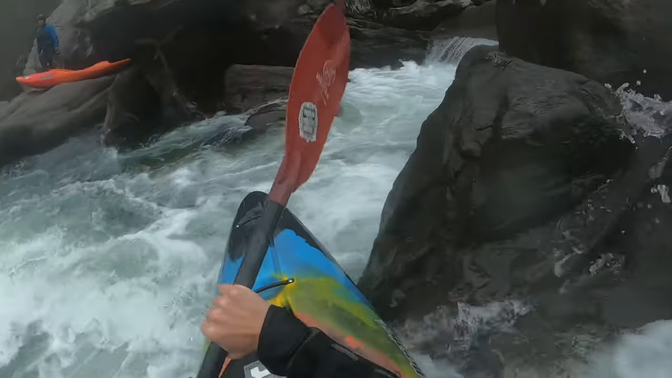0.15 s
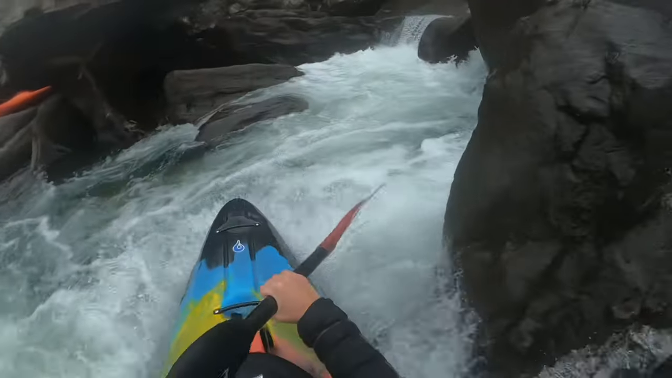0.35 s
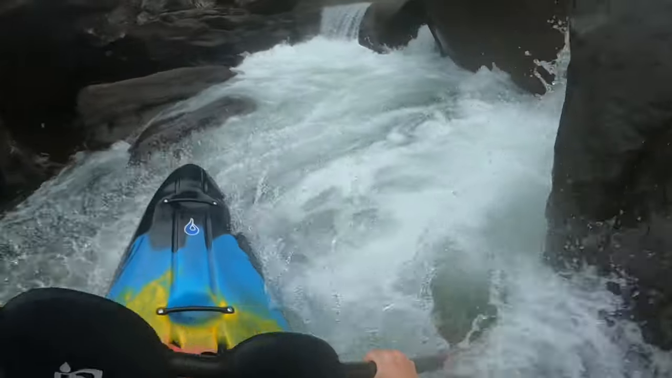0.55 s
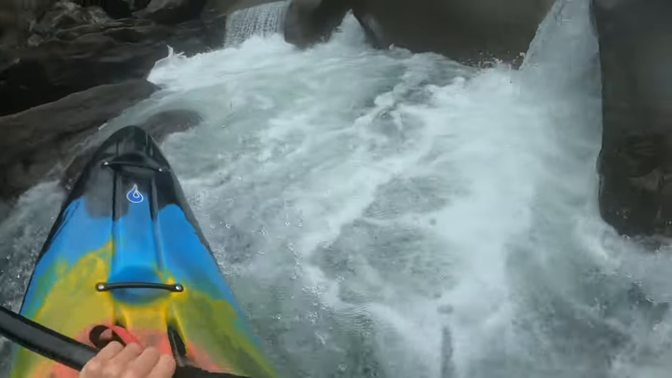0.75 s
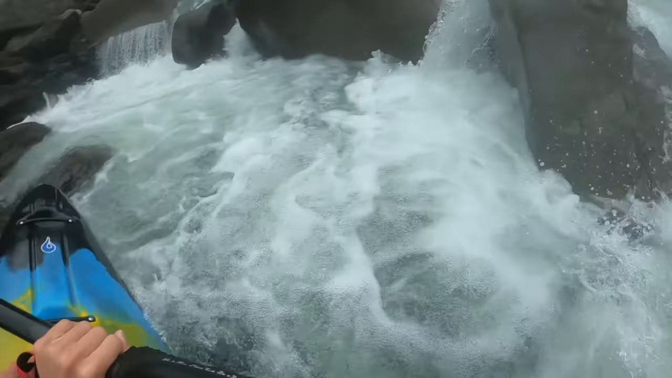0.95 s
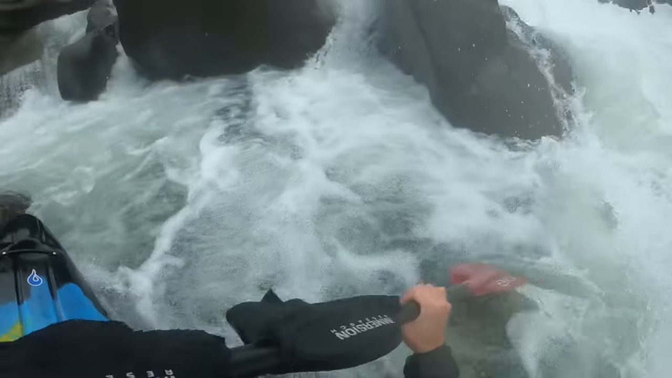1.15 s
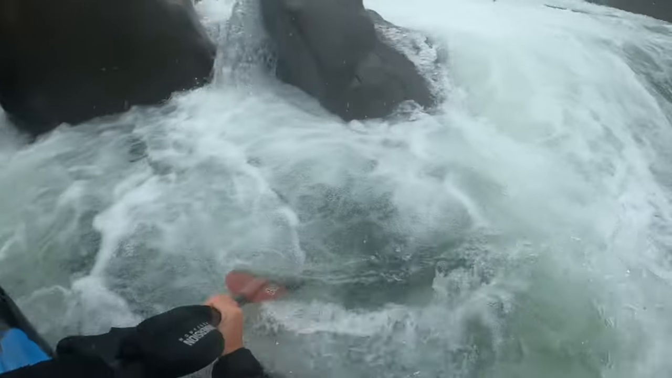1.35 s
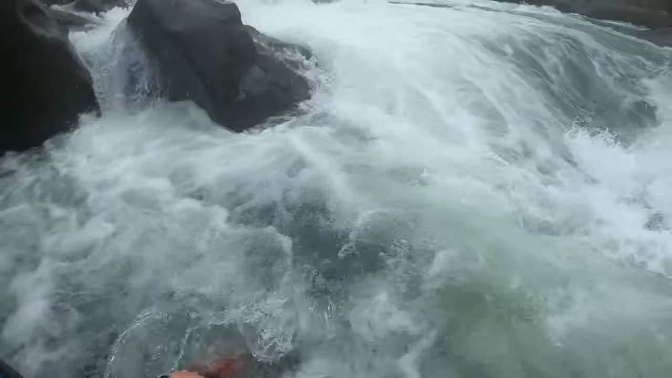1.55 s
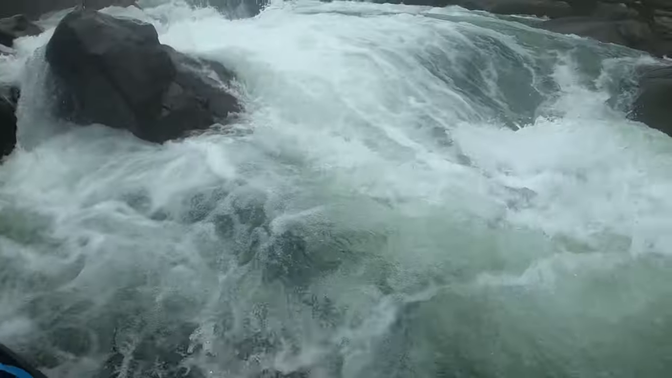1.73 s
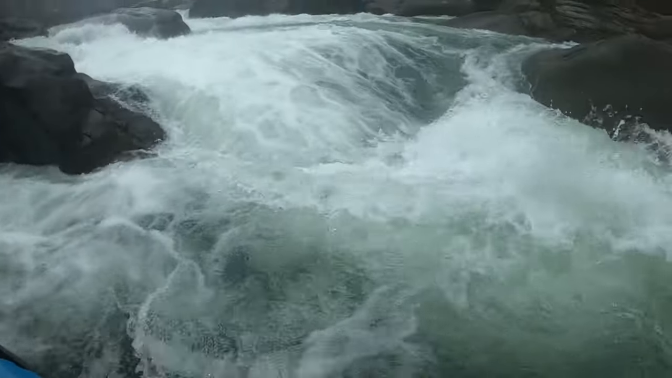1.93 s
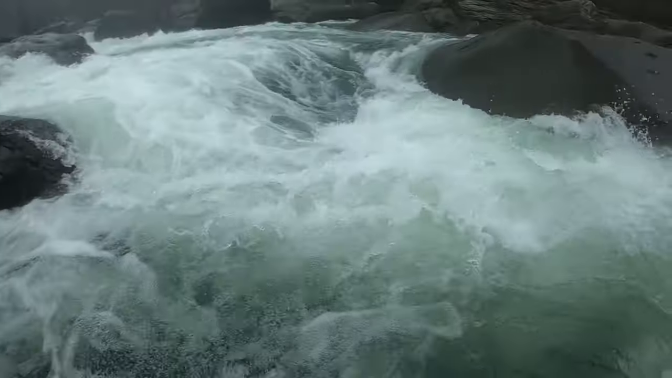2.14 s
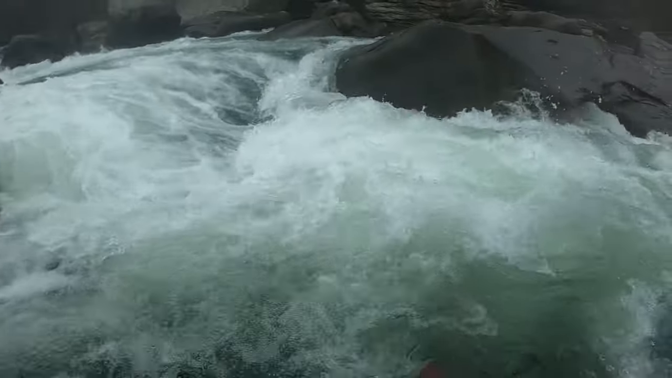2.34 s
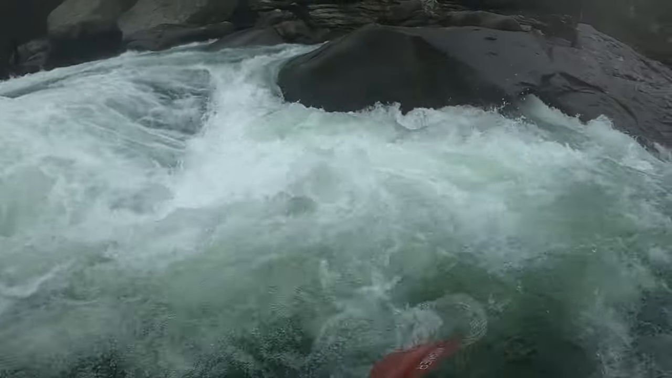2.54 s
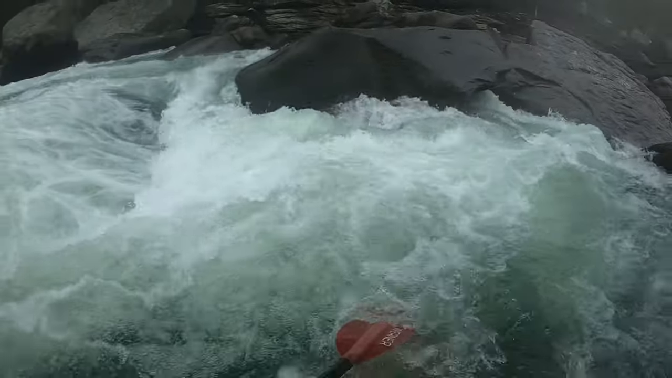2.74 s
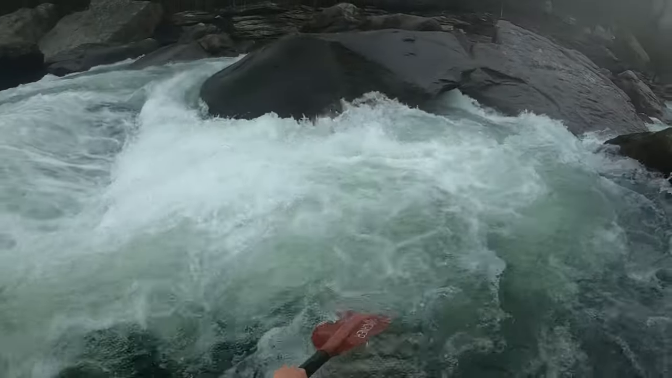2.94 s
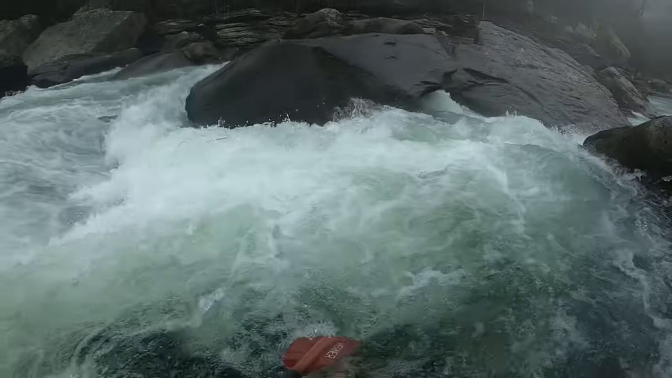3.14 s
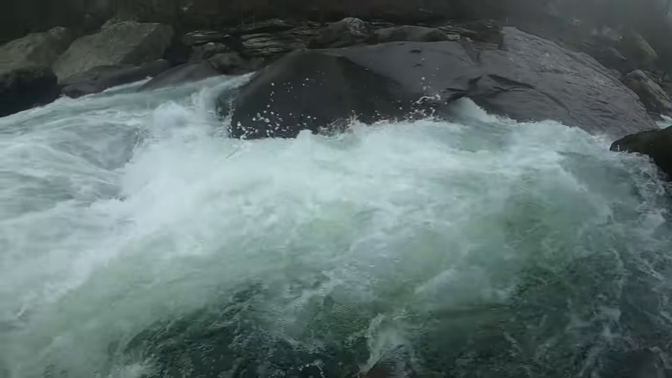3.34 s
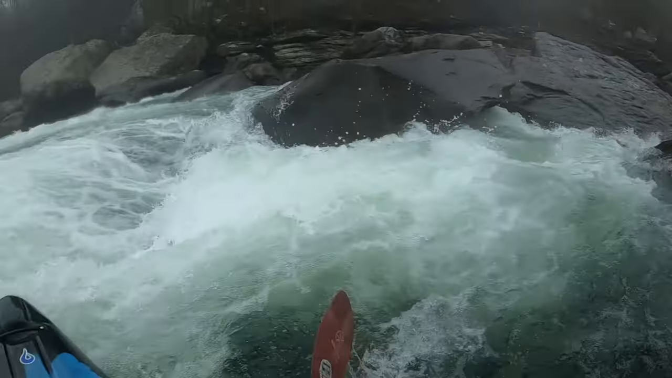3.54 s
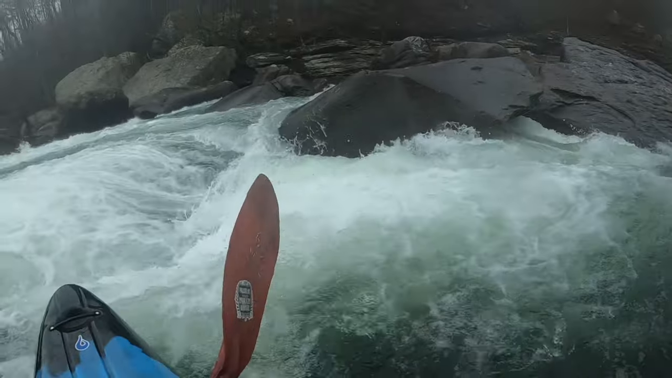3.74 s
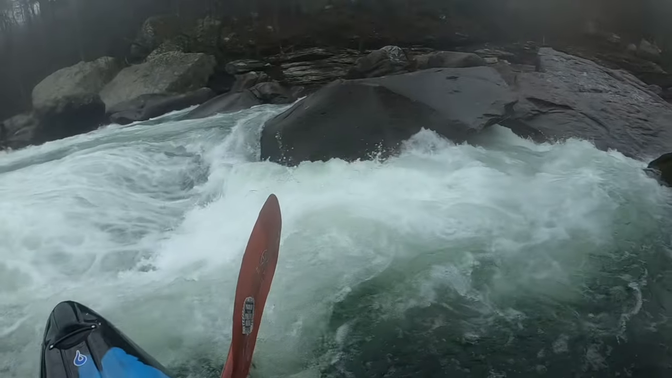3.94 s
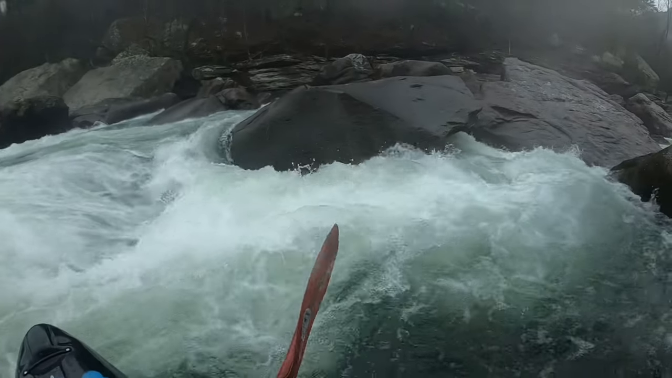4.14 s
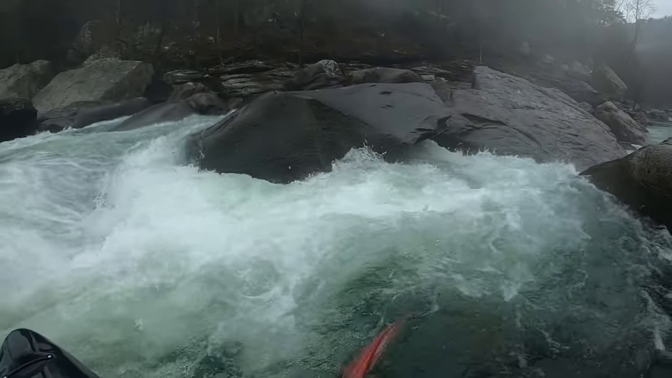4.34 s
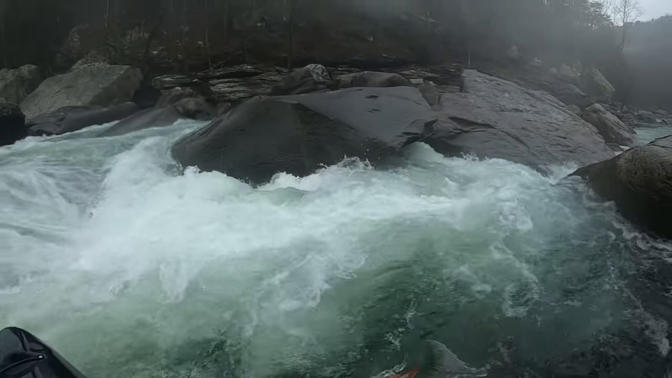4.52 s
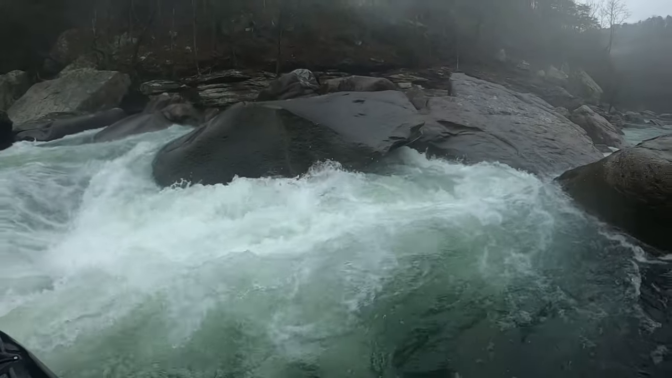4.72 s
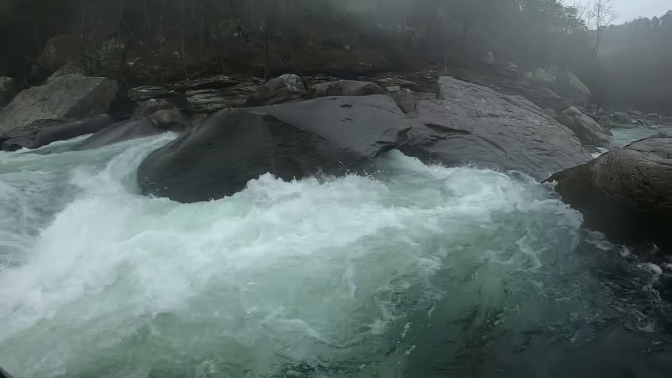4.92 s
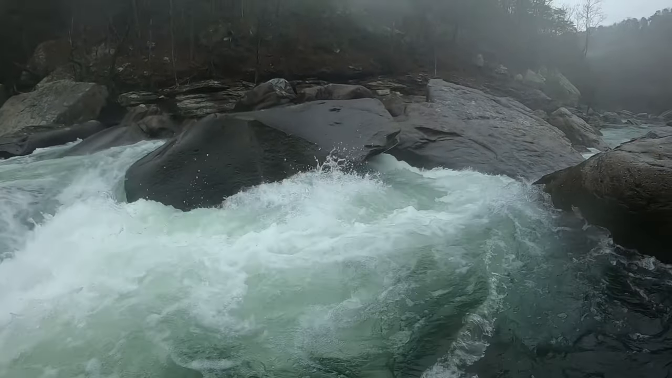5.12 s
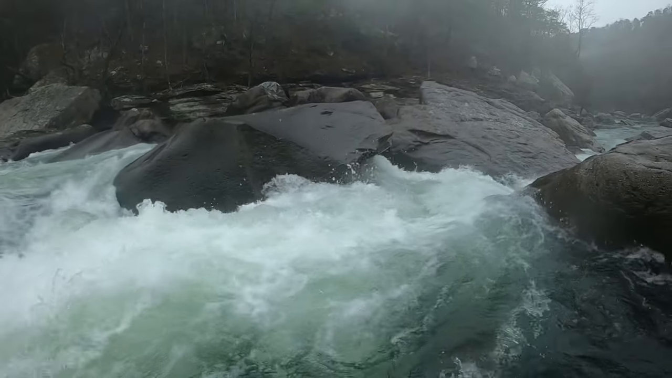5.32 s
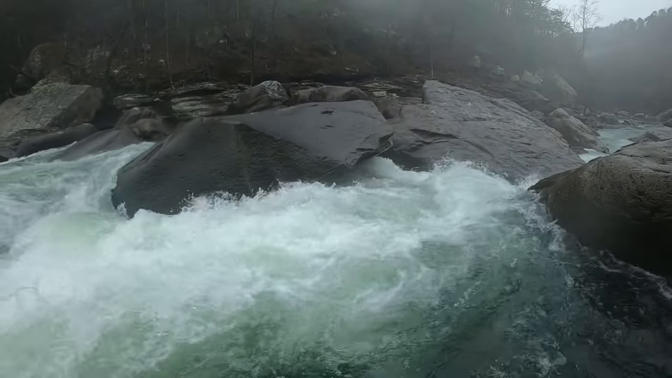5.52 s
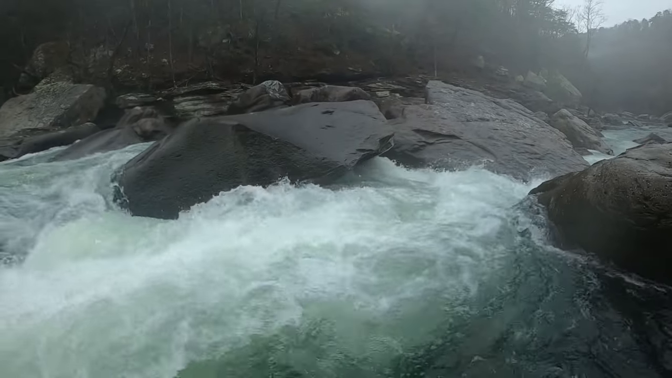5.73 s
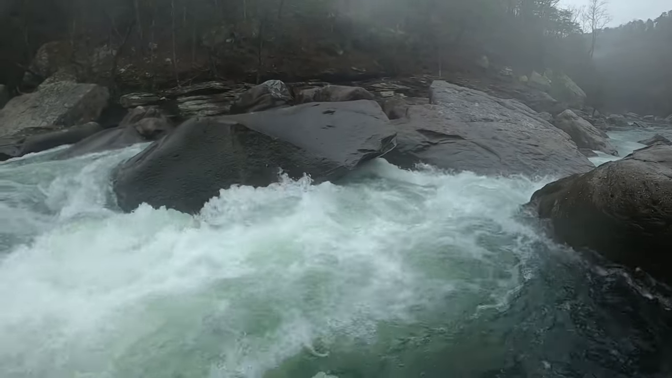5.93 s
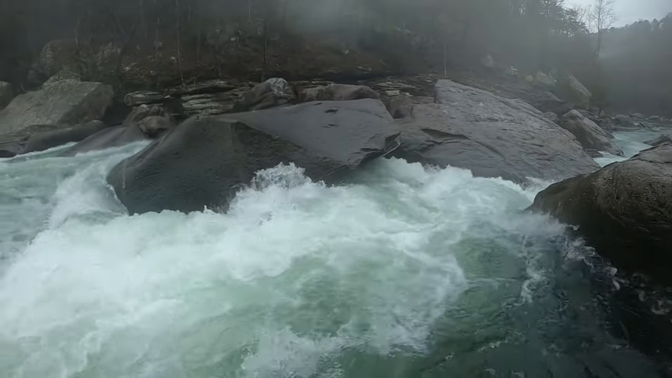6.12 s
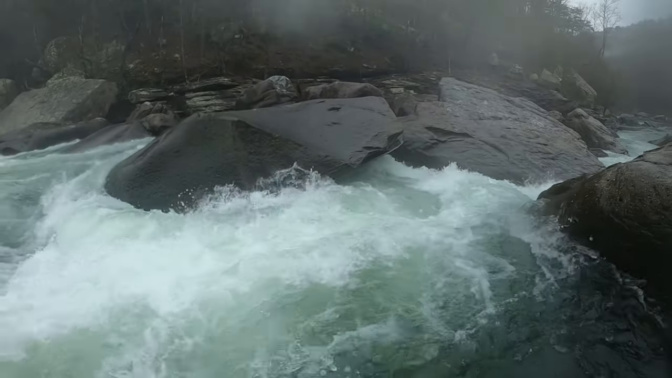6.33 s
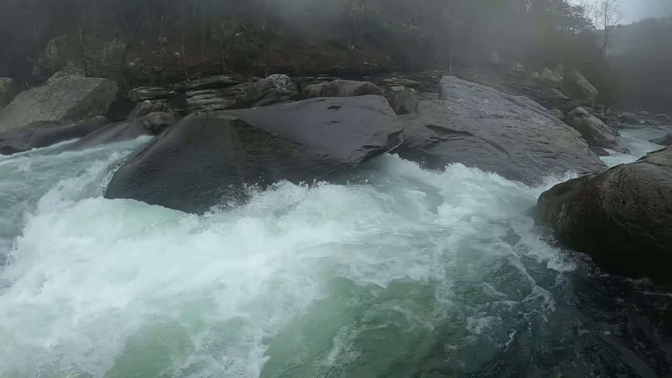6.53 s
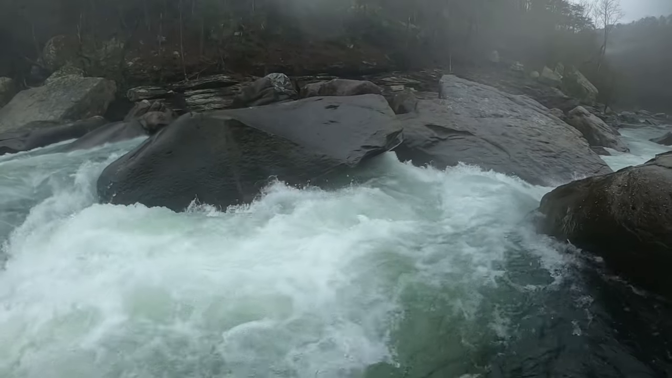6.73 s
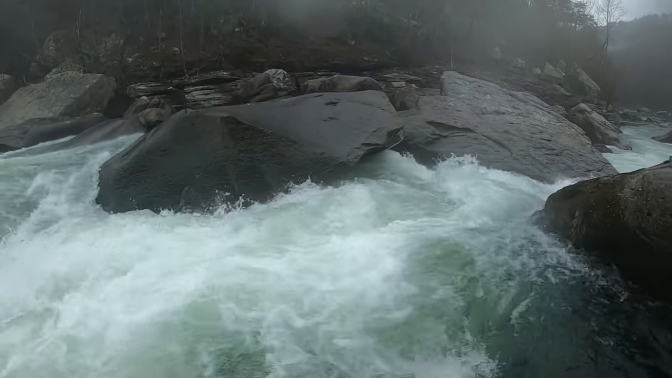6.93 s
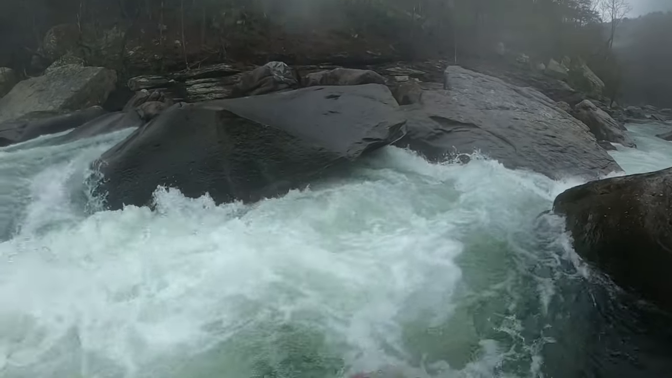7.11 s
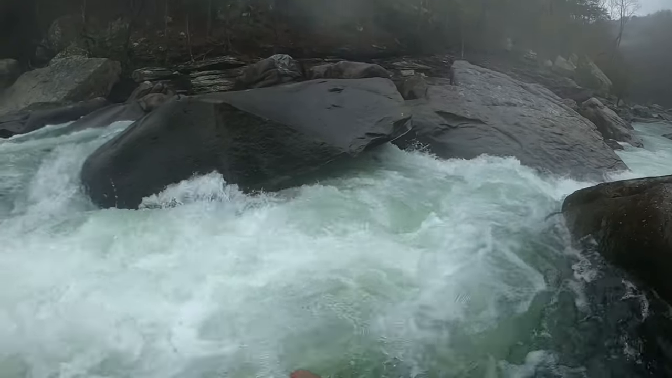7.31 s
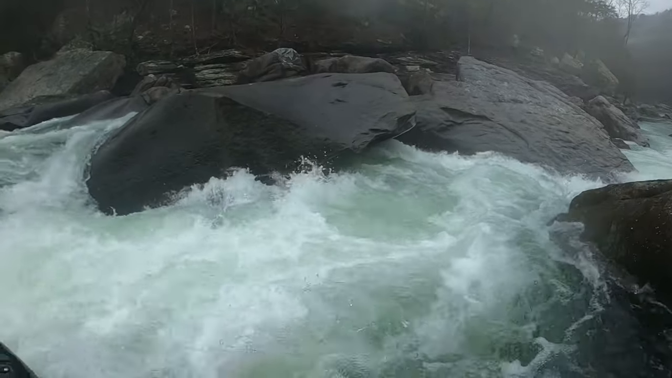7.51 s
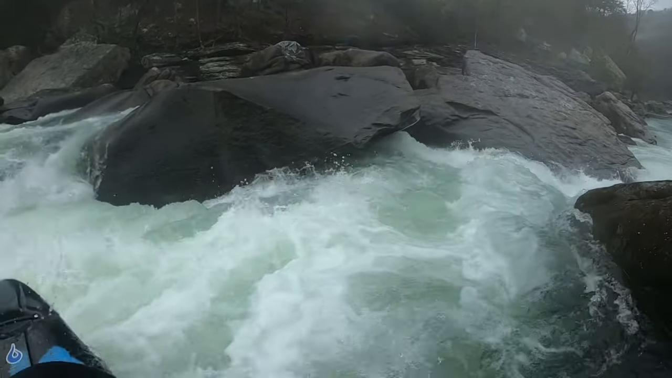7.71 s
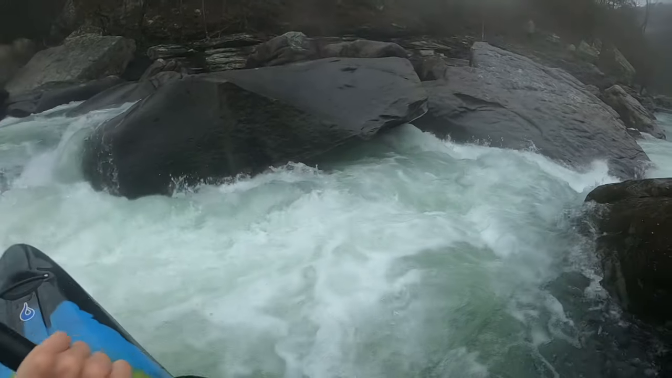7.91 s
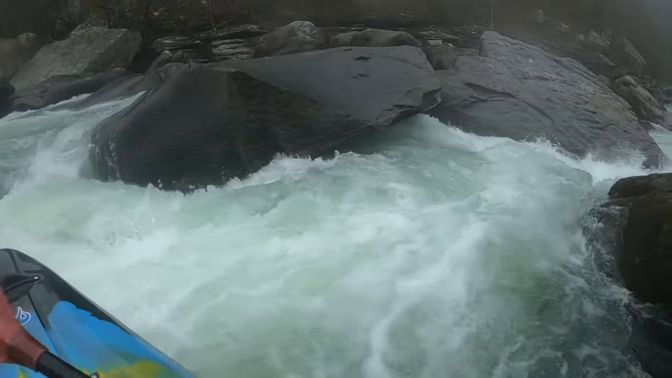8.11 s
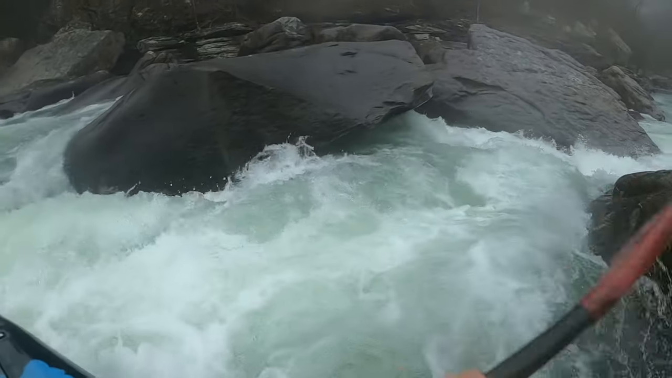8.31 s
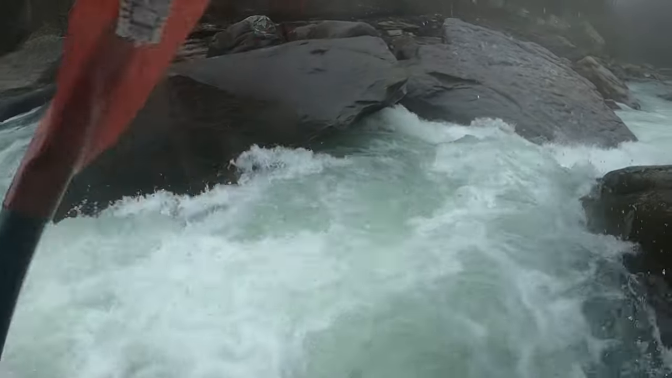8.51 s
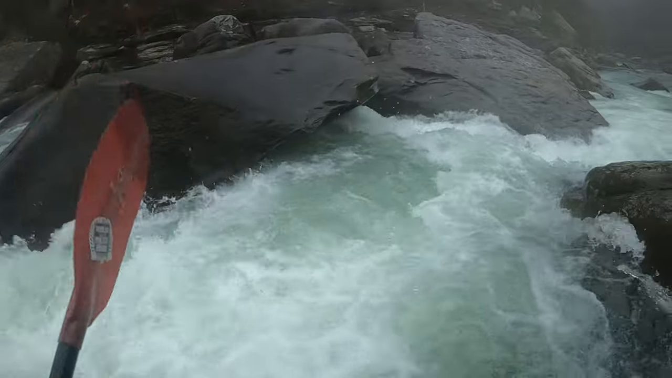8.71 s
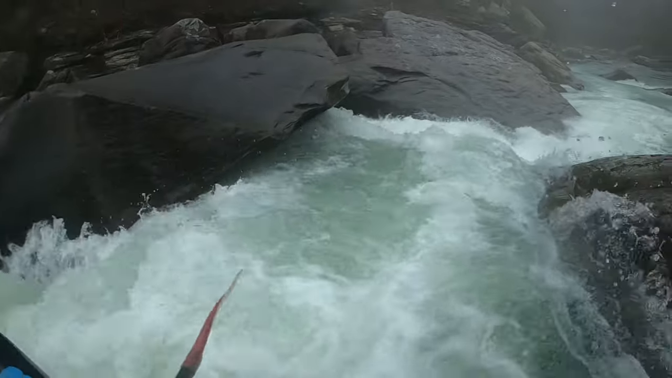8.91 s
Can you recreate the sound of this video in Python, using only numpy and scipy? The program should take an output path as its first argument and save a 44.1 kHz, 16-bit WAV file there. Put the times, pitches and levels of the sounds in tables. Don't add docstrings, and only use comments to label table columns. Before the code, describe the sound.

A continuous, close whitewater roar surrounds a kayak, hollow and hissy in wide stereo through a small waterproof camera's ports, with heavy low churning and wind rumble on the housing. From 0 to 1.3 s drops strike hard: ticks, bassy thumps, short crackling spatters and clipped knocks, densest around 0.5-1.2 s, each making the roar duck; a bubble bloops at 0.4 s. Softer low bumps follow near 1.6 s. From 2 s the subdued rush slowly climbs, becoming full and steady by about 4 s as the gusts ease. Small rounded bubbles pop near 2.1, 3.2, 3.5, 4.0, 4.5, 6.0 and 7.2 s, several leaning left. Light spatter and dull bumps come around 6.4 s, with more spatter at 7.6 and 8.3 s as wind rumble returns. At 8.7 s a violent smack overloads the microphone, and the roar drops sharply until the end at about 9 s.

```python
import sys
import numpy as np
from scipy import signal
from scipy.fft import rfft, irfft
from scipy.io import wavfile
from scipy.ndimage import uniform_filter1d

SR = 44100
rng = np.random.default_rng(int(sys.argv[2]) if len(sys.argv) > 2 else 0)


def gain_from_db(level_db):
    decades = np.asarray(level_db, float) / 20
    return 10 ** decades


def store_pcm(level_fs):
    pcm = np.round(np.clip(level_fs, -1, 1) * 32767).astype(np.int16)
    wavfile.write(sys.argv[1], SR, np.atleast_2d(pcm).T)


N = 395136
TIME = np.arange(N) / SR
OPPOSITE = np.array([[1], [-1]])


def in_time(rows):
    s, *columns = np.transpose(rows)
    return [np.interp(TIME, s, c) for c in columns]


def at_hz(points, hz):
    p = np.array(points, float)
    return np.interp(np.log(hz + 1), np.log(p[:, 0] + 1), p[:, 1])


def drift(rate_hz):
    r = np.exp(-80 * np.pi * rate_hz / SR)
    noise = rng.standard_normal(N // 40 + 2002)
    slow = signal.lfilter([1], [1, -2 * r, r * r], noise)[2000:]
    smooth = np.interp(np.arange(N) / 40, np.arange(len(slow)), slow / slow.std())
    return uniform_filter1d(smooth, size=40)


def add(out, sound, start_s):
    i = max(int(start_s * SR), 0)
    out[..., i:i + sound.shape[-1]] += sound[..., :N - i]


# freq_hz, correlation
LIKENESS = [(30, .986), (250, .995), (450, .83), (690, .52), (950, .84), (1170, .78), (1350, .28),
            (1700, .77), (1930, .62), (2250, .8), (2600, .2), (3500, .58), (4900, .25), (7500, .08)]
# freq_hz, lead_rad
LEAD = [(60, .05), (260, .15), (520, .75), (750, .3), (1000, .4), (1250, 1.9), (1400, -.5), (1750, -.2),
        (2200, -1.1), (2700, .1), (3400, -1.1), (3900, -.6), (4700, -2.8), (6000, -3.4)]


def port_noise(left_db, right_db, hz, patchy_db, rate_hz, count, tilt_db=0):
    draw = rfft(rng.standard_normal((2, N)))
    alike = np.clip(at_hz(LIKENESS, hz), -.99, .995)
    shared = np.sqrt(1 + alike) * draw[0]
    opposed = np.sqrt(1 - alike) * draw[1] * OPPOSITE
    pair = (shared + opposed) * np.exp(.5j * at_hz(LEAD, hz) * OPPOSITE)
    pair = pair * gain_from_db(np.array([left_db, right_db]))
    loud_hz = hz[left_db > left_db.max() - 30]
    place = np.interp(np.log(hz + 1), np.log(loud_hz[[0, -1]] + 1), [0, count - 1])
    out, together = 0, drift(rate_hz)
    for k in range(count):
        band = irfft(pair * np.maximum(1 - abs(place - k), 0), N)
        flicker_db = patchy_db * (0.62 * together + drift(rate_hz))
        out = out + band * gain_from_db(flicker_db + tilt_db * (k / (count - 1) - .5))
    return out / out.mean(axis=0).std()


# time_s, level_db
PASSAGE = [(0, -22.5), (.12, -22.5), (.3, -28.5), (.55, -27.5), (1.0, -28.5), (1.15, -33.5), (2.0, -29),
           (2.9, -23), (3.6, -19.5), (4.2, -18.5), (5.8, -19), (6.8, -21), (8.4, -22), (8.67, -23.5),
           (8.71, -33), (8.96, -32.5)]


def passage_db():
    return in_time(PASSAGE)[0]


# freq_hz, density_db_per_hz
CHURN = [(40, -62), (75, -12), (105, 1), (140, 1), (200, 3.5), (260, -3), (330, -5.5), (430, -26),
         (900, -130)]
CHURN_UNDER_DB = -20
CHURN_FOLLOWS = 1.06


def churn(hz):
    level_db = CHURN_UNDER_DB + CHURN_FOLLOWS * (passage_db() + 20.5)
    shape_db = at_hz(CHURN, hz)
    return gain_from_db(level_db) * port_noise(shape_db, shape_db, hz, patchy_db=1.0, rate_hz=6.0, count=2)


# centre_s, half_length_s, above_lull_db
GUSTS = [(0, .06, 13.5), (.3, 0.076, 16.5), (0.545, 0.14, 22.5), (0.846, .09, 17.5), (1.11, 0.12, 25),
         (1.293, .06, 13.5), (1.65, 0.19, 14), (2.12, 0.26, 14.5), (3.197, 0.21, 7), (4.4, 0.19, 1),
         (5.45, 0.33, 3), (6.054, 0.13, 10.5), (6.42, 0.18, 10.5), (7.205, 0.42, 12), (7.645, 0.21, 11),
         (8.05, 0.24, 14.5), (8.437, 0.14, 17), (8.632, 0.066, 18.5), (8.925, .06, 17)]


def gusting_db():
    power = 1
    for centre_s, half_s, level_db in GUSTS:
        power = power + gain_from_db(2 * level_db) * np.exp(-2 * ((TIME - centre_s) / half_s) ** 2)
    return 10 * np.log10(power)


# freq_hz, density_db_per_hz
WIND = [(8, -12), (20, 19.5), (35, 5.5), (55, 6.5), (75, 1.5), (110, -13.5), (180, -32.5), (600, -130)]
LULL_DB = -2


def wind(hz):
    level_db = passage_db() + LULL_DB + gusting_db()
    shape_db = at_hz(WIND, hz)
    return gain_from_db(level_db) * port_noise(shape_db, shape_db, hz, patchy_db=2.5, rate_hz=6.5, count=2)


# freq_hz, level_db
SPRAY = [(7150, 1.5), (7650, -7.5), (8050, -29), (8250, -20.5), (8700, -13), (10800, -19), (12200, -17.5),
         (13500, -28), (15000, -33), (16500, -57)]
# freq_hz, density_db_per_hz
PORT_L = [(380, -6.5), (520, -5.5), (700, -10), (860, -11.5), (1150, -6.5), (1430, -4), (2000, -19),
          (2300, -14.5), (2850, -11.5), (3400, -11.5), (3800, -17.5), (5300, -21.5), (5850, -38),
          (7100, -34)]
# freq_hz, density_db_per_hz
PORT_R = [(380, -7.5), (520, -9), (700, -14), (860, -15.5), (1200, -9.5), (1700, -11.5), (2100, -16.5),
          (2600, -17), (3100, -12.5), (3450, -17.5), (3800, -17), (4600, -17), (5850, -28), (7100, -34.5)]
# left_hz, right_hz, width_hz, peak_db
CAVITY = [(975, 1068, 126, 11), (3003, 2350, 175, 4), (1274, 4100, 170, -0.5)]


def port_db(shape, side, hz):
    below = np.minimum(40 * np.log10((hz + 1) / 380), 0)
    peaks = 0
    for *centre_hz, width_hz, peak_db in CAVITY:
        peaks = peaks + peak_db / (1 + (2 * (hz - centre_hz[side]) / width_hz) ** 2)
    return at_hz(shape, hz) + peaks + below + at_hz(SPRAY, hz)


# time_s, treble_tilt_db
BRIGHTNESS = [(0, 4.5), (1.2, 2.5), (2.4, 1.5), (4, -0.9), (6, 0), (7.5, 2.5), (8.96, 1)]


def roar(hz):
    left_db = port_db(PORT_L, side=0, hz=hz)
    right_db = port_db(PORT_R, side=1, hz=hz)
    tilt_db = in_time(BRIGHTNESS)[0]
    noise = port_noise(left_db, right_db, hz, patchy_db=0.67, rate_hz=22, count=8, tilt_db=tilt_db)
    return gain_from_db(passage_db()) * noise


def river():
    hz = np.arange(N // 2 + 1) * SR / N
    return churn(hz) + wind(hz) + roar(hz)


# start_s, peak_db, pitch_hz, left_over_right_db
BUBBLES = [
    (0.433, 3.5, 1460, 6),
    (2.091, -16, 1020, 2.0),
    (3.162, -4.5, 1430, 1.5),
    (3.531, -8, 1440, 8),
    (4.02, -7, 1080, -1),
    (4.463, -9, 1400, 3.0),
    (6.04, -7.5, 982, 9),
    (7.195, -5, 1040, 6),
]


def bubbles():
    out, t = np.zeros((2, N)), np.arange(SR // 25) / SR
    for start_s, peak_db, pitch_hz, pan_db in BUBBLES:
        tone = np.sin(2 * np.pi * pitch_hz * t * (1 + 2.6 * t)) * (1 - np.exp(-t / 0.00071))
        decay_db = -60 * t * pitch_hz / 18
        add(out, gain_from_db(peak_db + 2.0 + decay_db + pan_db / 2 * OPPOSITE) * tone, start_s)
    return out


# start_s, length_s, level_db, centre_hz
SPATTER = [(0.091, 0.0085, -12, 133), (0.098, 0.011, -10, 447), (0.407, 0.013, -5.5, 201),
           (0.408, 0.018, -17.5, 700), (.42, 0.0048, -18, 1720), (0.845, 0.016, -22, 594),
           (0.831, 0.065, -34, 2170), (0.862, 0.0071, -9.5, 487), (0.885, 0.021, -20, 503),
           (0.95, 0.022, -12.5, 600), (0.99, 0.028, -17.5, 740), (1.066, 0.019, -19.5, 490),
           (6.362, .012, -10.5, 301), (7.603, 0.011, -23, 234), (8.266, 0.055, -12.5, 189),
           (8.646, 0.0071, -18, 920), (8.684, 0.0065, -10, 417), (8.74, 0.0036, -25, 876)]


def spatter():
    out, size = np.zeros((2, N)), SR // 8
    t = np.arange(size) / SR
    for start_s, length_s, level_db, centre_hz in SPATTER:
        grains = rng.standard_normal((3, size)) * rng.exponential(1, size) ** 1.36
        grains = (grains[0] + .5 * grains[1:]) * (t < length_s)
        spread = 3.2 if centre_hz > 330 else 1.4
        edges_hz = [centre_hz / spread, centre_hz * spread ** .6]
        burst = signal.sosfilt(signal.butter(3, edges_hz, "band", fs=SR, output="sos"), grains)
        rms = np.sqrt(np.sum(burst ** 2) / (2 * length_s * SR))
        add(out, gain_from_db(level_db) * burst / rms, start_s)
    return out


# start_s, pressure_step (+ in, - out), tick_db, gain_duck_db
DROPS = [(.030, -0.56, -40, -0.5), (0.08, 0.72, -30, -1), (0.1052, -1.6, -19, 3.5),
         (.323, -0.38, -40, -1.5), (0.4343, 0.29, -7, 1), (.475, 0.32, -40, -4.5), (0.518, 0.031, -40, 1),
         (.5375, 1.6, -0.5, 7), (.574, -1.6, -40, 5), (0.686, -.5, -40, 2.5), (.7172, 1.4, 1.5, 13.5),
         (.7895, 1.35, -3, 6), (0.871, -1.1, -23, 7), (0.9094, 1.16, -2, 6), (.9555, 1.4, -15, 2),
         (0.9659, 0.56, -12, 5), (1.001, 0.64, -16, 2), (1.0155, 1.2, 2.5, 9), (1.079, -1.5, -14, 3),
         (1.148, 1.43, 1.5, 9), (1.279, -1.4, -36, 1.5), (1.567, -0.33, -45, 0.5),
         (1.596, -1.44, -45, -1.5), (6.381, -0.39, -45, -1), (6.476, -0.31, -45, 0),
         (8.385, -0.31, -45, 0.5), (8.415, 0.57, -45, 2.5), (8.66, -0.75, -45, -1), (8.6864, 0.99, 6.5, 18),
         (8.739, -1.74, -22.5, 13.5)]


def ducking():
    db = np.zeros(N)
    for start_s, step, tick_db, duck_db in DROPS:
        after_s = TIME - start_s - .003
        hold = (after_s > 0) * np.exp(-(np.abs(after_s) / .075) ** 1.6)
        db = np.maximum(db, duck_db * hold)
    return gain_from_db(-signal.lfilter([.008], [1, -.992], db))


# pitch_hz, left_db, right_db, t60_s
TICK_MODES = [(1213, -5.5, -11, 0.02), (1485, -2.5, 6, 0.0064), (2030, -1.5, 1, 0.011),
              (3000, -2, -3.5, 0.0097), (3960, -8, -10, 0.0045)]
BASS_RING_HZ, BASS_RING_T60_S = 56, 0.14
LET_GO_S = 0.0019


def drops():
    out, t = np.zeros((2, N)), np.arange(int(.16 * SR)) / SR
    ring = np.cos(2 * np.pi * BASS_RING_HZ * t + .1) * gain_from_db(-60 * t / BASS_RING_T60_S)
    push = .62 * np.exp(-(t / .0025) ** 6) - .65 * np.exp(-(t / .004) ** 2)
    blow = (1.17 * ring + push) * (1 - np.exp(-(t / .0004) ** 2))
    release = 1.15 * ring * (1 - np.exp(-(t / LET_GO_S) ** 2))
    onset = 1 - np.exp(-(t / 0.0002) ** 2)
    chance = rng.standard_normal((len(DROPS), len(TICK_MODES), 4))
    for (start_s, step, tick_db, duck_db), luck in zip(DROPS, chance):
        sharp = step > 0 and tick_db > -12
        if sharp:
            add(out, step * blow, start_s + .0019)
            add(out, -.45 * step * np.hanning(70), start_s + 0.00085)
        else:
            add(out, step * release, start_s)
        for (pitch_hz, left_db, right_db, t60_s), (a, b, c, d) in zip(TICK_MODES, luck):
            mode_db = np.array([[left_db + 1.5 * a], [right_db + 1.5 * b]])
            detune = 1 + 0.057 * np.array([[c], [d]])
            tone = onset * np.sin(2 * np.pi * pitch_hz * t * detune)
            add(out, -OPPOSITE * gain_from_db(tick_db + mode_db - 60 * t / t60_s) * tone, start_s)
    return out


def scene():
    return river() * ducking() + bubbles() + spatter() + drops()


def band_limit(x):
    return signal.sosfilt(signal.butter(12, 15400, fs=SR, output="sos"), x)


def record(dry):
    top = .995
    mix = np.clip(dry, -top, top)
    return band_limit(mix)


dry = scene()
out = record(dry)
store_pcm(out)
```